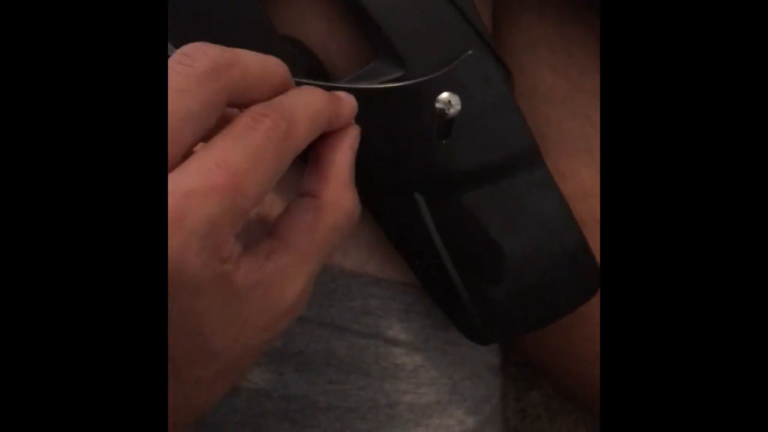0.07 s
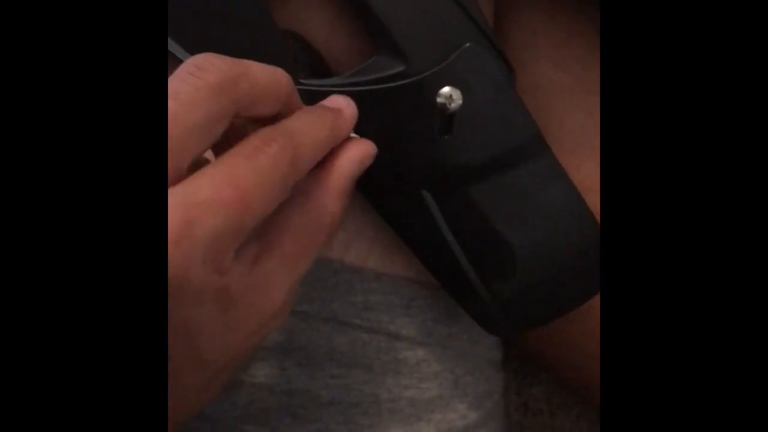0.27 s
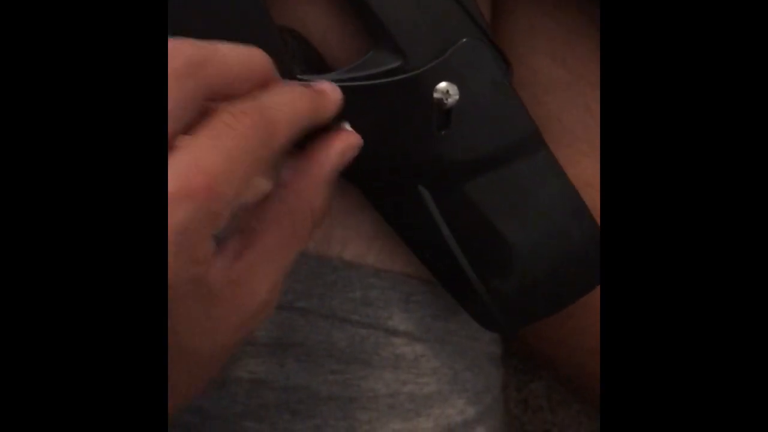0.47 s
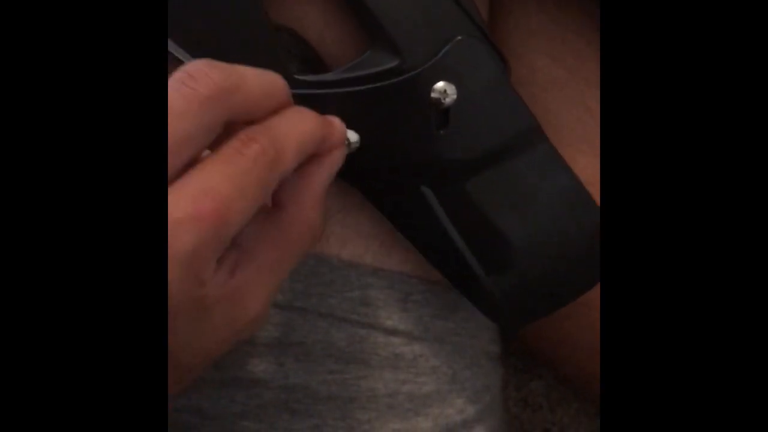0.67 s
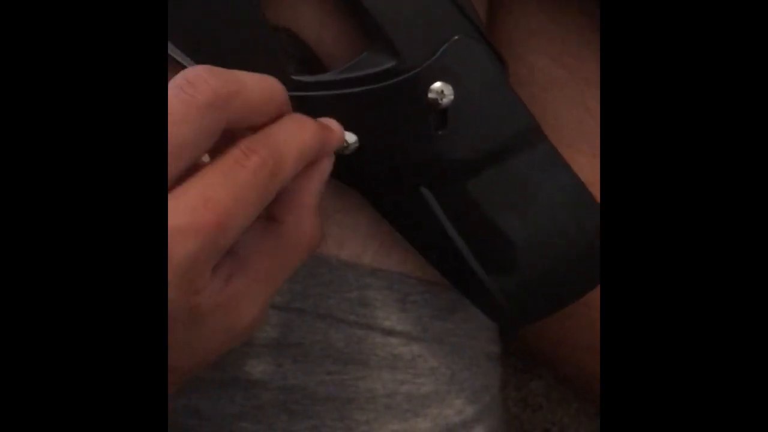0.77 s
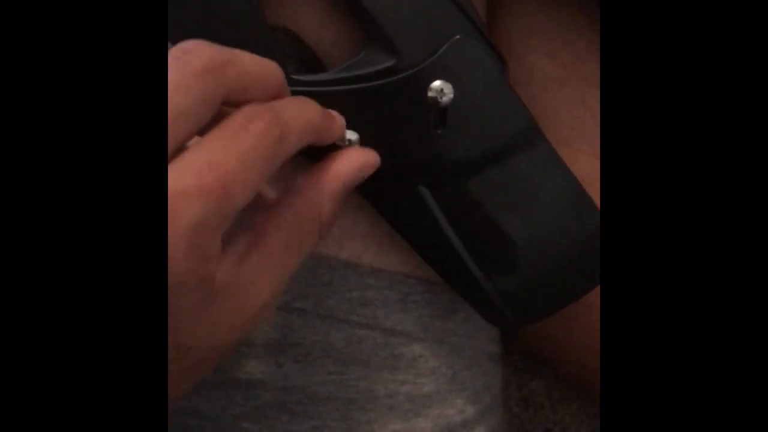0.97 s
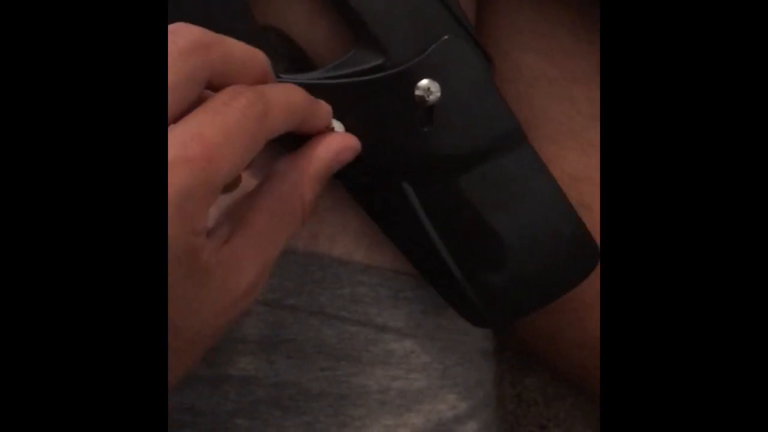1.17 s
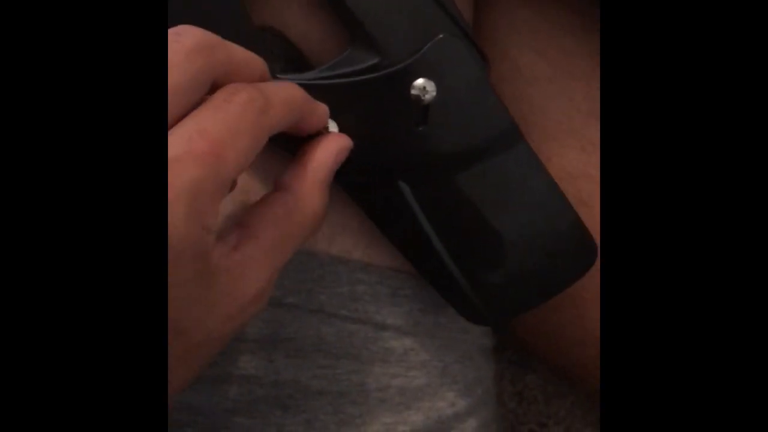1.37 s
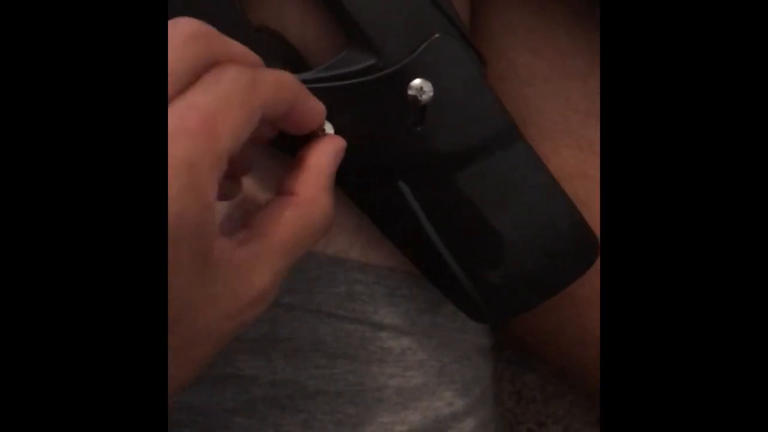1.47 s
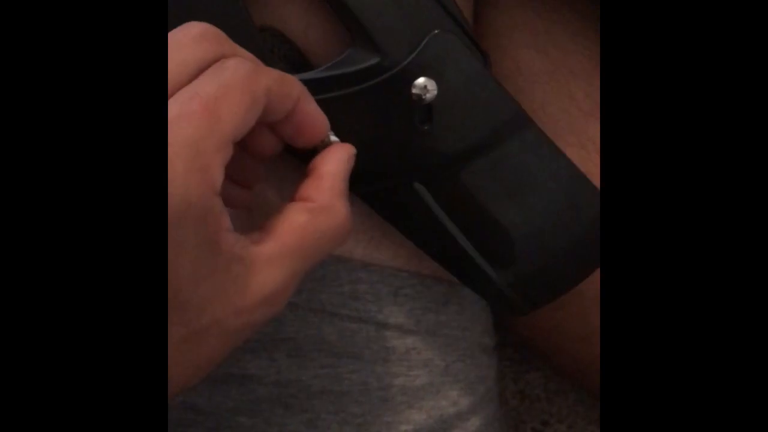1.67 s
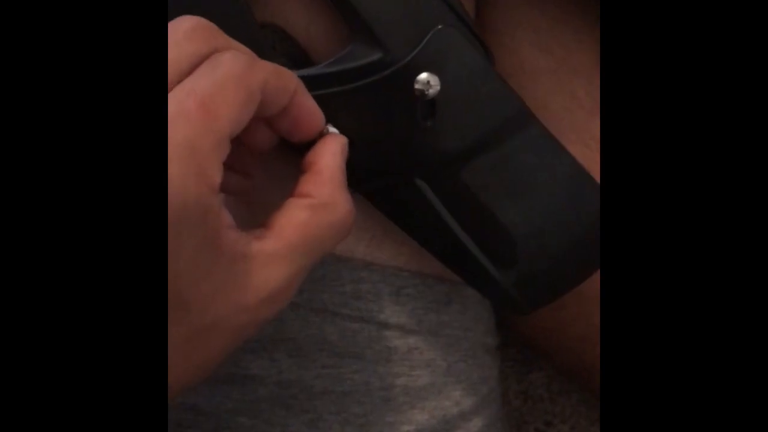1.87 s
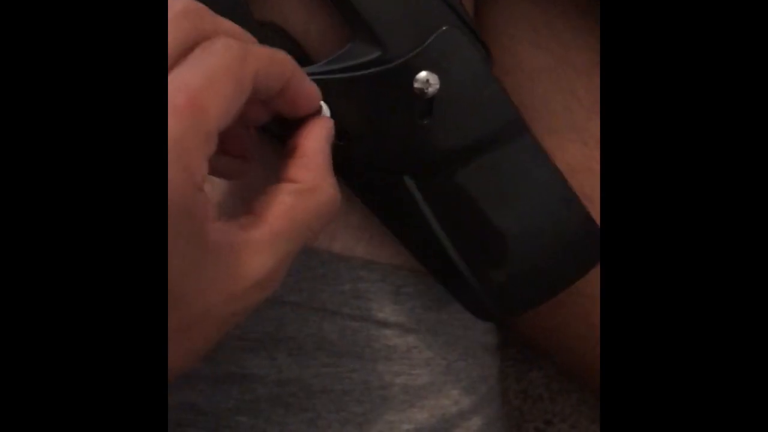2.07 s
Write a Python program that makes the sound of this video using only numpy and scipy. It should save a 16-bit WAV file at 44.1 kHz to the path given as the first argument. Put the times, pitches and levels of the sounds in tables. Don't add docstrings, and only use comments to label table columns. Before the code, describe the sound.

Small metal screw clicking on hollow hard plastic, very close, in a quiet room with short soft echo. A sharp cluster snaps at 0.2 s, a lighter tick at 0.34, then a rattling burst from 0.62 to 0.7. Faint taps and finger scuffs thin out until a crisp snap at 1.83, followed by dull low bumps around 1.96 and small clicks near 2.08. Low hum and varying hiss underneath.

```python
import sys
import numpy as np
from scipy import signal
from scipy.fft import rfft, irfft, next_fast_len
from scipy.io import wavfile
from scipy.ndimage import map_coordinates

SR = 44100
rng = np.random.default_rng(int(sys.argv[2]) if len(sys.argv) > 2 else 0)


def to_wav(sig):
    pcm = np.clip(np.atleast_2d(sig), -1, 1) * 32767
    pcm = np.round(pcm).astype(np.int16)
    wavfile.write(sys.argv[1], SR, pcm.T)


def decibels_to_gain(level_db):
    exponent = np.asarray(level_db, float) / 20
    return 10 ** exponent


N = 92610


def unit(x):
    return x / np.sqrt(np.mean(x ** 2) + 1e-20)


def along(points, hz):
    f, v = np.transpose(points)
    return np.interp(np.log(hz + 1), np.log(f + 1), v)


def filtered(x, response):
    m = next_fast_len(N + SR // 2)
    return irfft(rfft(x, m) * response(np.fft.rfftfreq(m, 1 / SR)), m)[:N]


def colored(x, color):
    return unit(filtered(x, lambda hz: decibels_to_gain(along(color, hz))))


def wobble(rate):
    return map_coordinates(rng.standard_normal(N // 40), [np.arange(N) * rate / SR])


def ring(modes, rise_s, t):
    hz, db, t60 = np.transpose(modes)[..., None]
    level_draw, pitch_draw, phase_draw = rng.standard_normal((3, len(modes), 1))
    fade = decibels_to_gain(db + 1.5 * level_draw - 60 * t / t60)
    flip = np.pi * np.arange(len(modes))[:, None]
    phase = 2 * np.pi * hz * (1 + .012 * pitch_draw) * t + .25 * phase_draw + flip
    tone = (fade * np.sin(phase)).sum(0) * (1 - np.exp(-t / rise_s))

    soon = t[:SR // 40]
    chatter = decibels_to_gain(-21 - 60 * soon / .003)
    buzz = decibels_to_gain(-30.5 - 60 * soon / .024)
    rattle = (chatter + buzz) * rng.standard_normal(len(soon))
    rattle[0] = 1
    tone = signal.fftconvolve(tone, rattle)[:len(t)]
    return tone / np.sqrt(np.mean(tone[:100] ** 2))


# (time [s], screw tick level [dB], shell
# level over tick [dB], flap level over tick [dB], edge level over tick [dB])
CLICKS = [(0.2082, -45, 12.5, 4, -10.5), (0.213, -27.5, -1.5, 0.5, 7.5), (0.2182, -24, -4, -10.5, 1.5),
          (0.2274, -40, -2, 0, -4), (0.241, -49, 5.5, 0, -10), (0.275, -40.5, -2, -4, -12),
          (0.333, -52.5, -2.5, 13.5, -8), (0.3405, -35, -3, -2, -3), (0.616, -36, -4, -6, -10),
          (0.6238, -24, -12, -12, -8), (0.6388, -26.5, -8.5, -5.5, -15), (0.6442, -41.5, 1.5, -6, -19),
          (0.6503, -46, -4.5, -4, -19), (0.658, -39.5, -8, -4.5, -12), (0.6595, -32, -7.5, -12, -10),
          (0.6743, -22.5, -16, -6.5, -6), (0.6765, -26.5, -9.5, -4, -8.5), (0.6933, -35, 0, -8.5, -13),
          (1.8334, -36, -20, -20, 12), (2.0735, -60, 13, 11, 0), (2.0891, -43, 7, 5.5, -17),
          (2.0952, -56.5, -11, -1, -1),
          (0.056, -83.5, 26.5, 10, 6), (0.5402, -57.5, -11, -4, -4), (0.586, -68, 14, -28, -12),
           (0.754, -63.5, 14, -10, 2), (0.773, -51, -4, -11, -22), (0.7872, -56, 6.5, 4.5, -5),
           (0.8864, -47.5, 2.5, -7, -10.5), (0.9026, -54, -3.5, -14, -13), (0.947, -65.5, 11, 2, -15),
           (0.9539, -47, 0.5, -5, -23), (1.0262, -55, 1, -8, -15), (1.0342, -65.5, -5.5, -5, -17),
           (1.0393, -41.5, 0, -7.5, -6.5), (1.0795, -76, 0, 10, -13), (1.0933, -72.5, 7, 3, -7),
           (1.168, -47.5, -5, -2, -15), (1.197, -52.5, -13, -2.5, -10), (1.2049, -51.5, -14, -9, -31),
           (1.2124, -45.5, -5.5, -4, -11.5), (1.243, -64, 9, 5, -8.5), (1.41, -54, -1.5, -0.5, -12),
           (1.554, -66, -11, -7.5, -9), (1.696, -75, 14, 2, -12), (1.713, -55, 0.5, 1, -14),
           (1.811, -72, -12, -2, -1.5), (1.985, -60, -7, -5, -12), (2.0123, -58.5, 4, -7, -7)]
# (frequency [Hz], level [dB], t60 [s])
TICK = [(5030, -4, .005), (5550, -1, .006), (6150, 0, .004), (6750, -1, .004)]
SHELL = [(670, -20, .035), (930, -17, .02), (1130, -5, .02), (1330, 0, .03), (1560, -9, .02),
         (1740, -3, .026), (2120, -9, .016), (2360, -2, .02)]
FLAP = [(2700, -11, .009), (3230, -4, .008), (3580, -3, .009), (4050, -1, .006), (4550, -5, .005)]
EDGE = [(8400, -2, .003), (9250, -2, .003), (10000, -4, .003), (11000, -2, .003), (12000, -3, .003),
        (13100, -8, .003), (14300, -12, .003), (15400, -12, .003)]


def contacts():
    out, t = np.zeros(N + SR), np.arange(SR // 12) / SR
    snap_s, shell_s = .00012, .0011
    for s, db, shell_db, flap_db, edge_db in CLICKS:
        hit = decibels_to_gain(-0.8) * ring(TICK, snap_s, t)
        hit += decibels_to_gain(shell_db - 1.85) * ring(SHELL, shell_s, t)
        hit += decibels_to_gain(flap_db + 0.65) * ring(FLAP, snap_s, t)
        hit += decibels_to_gain(edge_db + 3) * ring(EDGE, snap_s, t)
        out[round(s * SR):][:len(t)] += decibels_to_gain(db) * hit
    return out[:N]


# (frequency [Hz], level [dB], t60 [s])
SEATED = [(663, -29.5, 0.035), (1150, -14, 0.019), (1314, -13.5, 0.029), (1730, -16, 0.027),
          (2324, -14.5, 0.021), (2780, -21.5, 0.0092), (3550, -12.5, .012), (4030, -7.5, 0.0075),
          (4900, -10, 0.0084), (5600, -2.5, 0.0055), (6150, -0.5, 0.0054), (6760, -3, 0.0055)]


def snap_home():
    out, t = np.zeros(N + SR), np.arange(SR // 12) / SR
    out[round(1.8334 * SR):][:len(t)] += decibels_to_gain(-16.5) * ring(SEATED, .00026, t)
    return out[:N]


# (time [s], frequency [Hz], level [dB], t60 [s])
BELLIES = [(0.054, 1236, -66, .05), (.2078, 2340, -30, .012), (0.2129, 6340, -1, 0.0051),
           (0.214, 5500, -17, 0.007), (0.2184, 4210, -3, 0.0043), (0.2182, 6430, -9, 0.0044),
           (.219, 5450, -15.5, 0.0094), (0.223, 4200, -30, 0.013), (.2285, 4460, -36, 0.016),
           (0.3408, 5900, -27.5, 0.012), (.617, 1300, -33, 0.021), (.616, 3550, -32.5, 0.042),
           (.6237, 3550, -29.5, 0.048), (0.6236, 5550, -10, 0.006), (0.6372, 2230, -38, 0.023),
           (.6764, 3250, -41, .011), (0.6758, 5200, -26, 0.0095), (.6764, 2130, -32, 0.022),
           (0.692, 5960, -46, .007), (0.755, 950, -49, 0.028), (0.7882, 1330, -58, .03),
           (0.887, 895, -41, .02), (0.8852, 1330, -70, 0.033), (0.9522, 1300, -59, .025),
           (.9542, 5750, -50, .007), (1.0385, 1150, -35.5, .025), (1.0407, 1330, -48, .035),
           (1.038, 3850, -43, .012), (1.168, 3840, -46, .014), (1.168, 2260, -55.5, .018),
           (1.2056, 3200, -55.5, .012), (1.211, 670, -54, .03), (1.211, 3950, -50, .01),
           (0.6597, 6100, -30, .005), (.6389, 5600, -28, .007), (.616, 5600, -20, .007),
           (1.245, 1351, -58, 0.037), (1.713, 5690, -46, 0.0081), (1.846, 6390, -38, .015),
           (1.8335, 11950, -14, .006), (1.8335, 10950, -17, .005), (1.8335, 6250, -14, .006),
           (.2128, 7300, -14, .003), (1.6995, 5000, -56, .006), (2.0737, 3520, -46, 0.0074),
           (2.0885, 5950, -41, 0.0096), (2.0871, 3530, -44, 0.012)]


def singing_modes():
    out, t = np.zeros(N + SR), np.arange(SR // 12) / SR
    rise = 1 - np.exp(-t / .0003)
    for s, hz, db, t60 in BELLIES:
        out[round(s * SR):][:len(t)] += decibels_to_gain(db - 60 * t / t60) * rise * np.sin(2 * np.pi * hz * t)
    return out[:N]


def screw_on_shell():
    small_hz = 614
    ringing = contacts() + snap_home() + singing_modes()
    return filtered(ringing, lambda hz: (1j * hz / (small_hz + 1j * hz)) ** 2)


# (peak time [s], rise [s], fall [s], level [dB])
SCUFFS = [(.058, 0.011, 0.026, -67.5), (0.195, 0.024, 0.011, -57), (0.211, 0.0068, 0.017, -36.5),
          (.333, 0.0046, 0.0058, -40.5), (0.628, 0.01, 0.011, -47), (0.66, 0.0029, 0.0089, -46.5),
          (0.681, 0.0082, 0.035, -49.5), (.72, .015, 0.014, -66), (0.755, 0.0045, 0.031, -59),
          (.91, 0.011, 0.0082, -70), (1.06, 0.024, 0.05, -73), (1.168, 0.005, 0.011, -59.5),
          (1.21, 0.0092, 0.015, -60), (1.247, 0.0056, 0.01, -60), (1.699, .012, 0.017, -69),
          (2.014, 0.0038, 0.0098, -70.5), (2.078, 0.0053, 0.015, -60.5)]
# (frequency [Hz], level [dB])
SCUFF_TONE = [(400, -24), (900, -3), (1300, 5.5), (1900, 1.5), (3600, -6), (5700, -10), (9000, -18.5),
              (16000, -29)]


def scuffs():
    t = np.arange(N) / SR
    stroke = np.zeros(N)
    for s, rise, fall, db in SCUFFS:
        width = np.maximum(np.where(t < s, rise, fall), .004)
        stroke += decibels_to_gain(db) * np.exp(-((t - s) / width) ** 2)
    grit = decibels_to_gain(3 * wobble(1500)) * rng.standard_normal(N)
    return stroke * colored(grit, SCUFF_TONE)


# (time [s], level [dB], frequency [Hz], length [s])
PUSHES = [
    (.222, -43.5, 238, 0.0042),
    (0.231, -53, 421, 0.0092),
    (0.638, -60.5, 283, 0.029),
    (0.708, -55, 335, 0.0071),
    (1.846, -62, 265, 0.0088),
    (1.959, -41, 65, 0.015),
    (2.003, -43.5, 70.6, 0.01),
    (2.076, -49, 59.4, 0.026),
]


def pushes():
    t = np.arange(N) / SR
    out = np.zeros(N)
    for s, db, hz, length in PUSHES:
        out -= decibels_to_gain(db) * np.exp(-((t - s) / length) ** 2) * np.sin(2 * np.pi * hz * (t - s))
    return out


# (frequency [Hz], t60 [s])
ROOM = [(500, .4), (2000, .3), (6000, .26), (10000, .17), (15000, .13)]
# (frequency [Hz], level [dB])
ROOM_TONE = [(500, 5.5), (1500, 0), (3000, -3), (6000, -3.5), (9000, -5.5), (14000, -1.5)]


def room(x):
    out, step = np.zeros(N + 2 * SR), SR // 10
    gap_s, rise_s = .0085, .0052
    for i in range(0, N, step):
        hz, t, z = signal.stft(rng.standard_normal(SR // 2), SR, nperseg=256)
        fade_db = along(ROOM_TONE, hz)[:, None] - 60 * t / along(ROOM, hz)[:, None]
        tail = signal.istft(z * decibels_to_gain(fade_db), SR, nperseg=256)[1]
        tail = tail * (1 - np.exp(-np.arange(len(tail)) / SR / rise_s))
        wet = signal.fftconvolve(x[i:i + step], tail / np.linalg.norm(tail))
        out[i + round(gap_s * SR):][:len(wet)] += wet
    return decibels_to_gain(-21.5) * out[:N]


# (frequency [Hz], width [Hz], level [dB])
HUM = [(58, 22, -61), (96, 12, -61), (119, 11, -67)]
# (frequency [Hz], level per Hz [dB])
AIR = [(25, -40.5), (50, -13), (100, 4.5), (200, -4.5), (400, -13), (800, -14), (1600, -20.5), (3500, -42)]


def background():
    out = decibels_to_gain(-66.5) * colored(rng.standard_normal(N), AIR)
    whine = (9100, 250, -88.5)
    for hz, width, db in [*HUM, whine]:
        band = filtered(rng.standard_normal(N), lambda f: 1 / (1 + ((f - hz) / width * 1.4) ** 2) ** 2)
        out += decibels_to_gain(db) * unit(band)
    return out


def scene():
    work = screw_on_shell() + scuffs()
    return (work + room(work) + pushes() + background())[None]


# (time [s], level [dB])
SUPPRESSOR = [
    (0, -75.5),
    (.17, -84),
    (0.214, -64),
    (0.679, -60),
    (.8, -69.5),
    (1.251, -79.5),
    (1.35, -90),
    (1.824, -94),
    (1.841, -65.5),
    (2.1, -58.5),
]
# (frequency [Hz], level per Hz [dB])
OPEN = [(300, 12), (1200, 1.5), (3000, 0.5), (7500, -3), (12000, -5.5), (16000, -7.5)]
HISS = [(150, 15), (400, 12), (1200, -0.5), (3000, -2), (7500, -5.5), (10500, -9.5), (13500, -0.5),
        (16000, -4)]


def recorder_hiss():
    s, db = np.transpose(SUPPRESSOR)
    gate_db = np.interp(np.arange(N) / SR, s, db) + .8 * wobble(2.7)
    air_hiss = decibels_to_gain(gate_db) * colored(rng.standard_normal(N), OPEN)
    return air_hiss + decibels_to_gain(-68.5) * colored(rng.standard_normal(N), HISS)


def band_limit(hz):
    top_hz, edge_hz = 15900, 70
    edge = np.clip((hz - top_hz) / edge_hz, -30, 30)
    leak = decibels_to_gain(-20 - np.abs(hz - top_hz) / 50)
    return 1 / (1 + np.exp(edge)) + leak / (1 + np.exp(-edge))


def top_cut(x):
    return signal.sosfilt(signal.butter(12, 17330, fs=SR, output="sos"), x)


def record(dry):
    mix = filtered(dry[0] + recorder_hiss(), band_limit)[None]
    return top_cut(mix)


dry = scene()
out = record(dry)
to_wav(out)
```